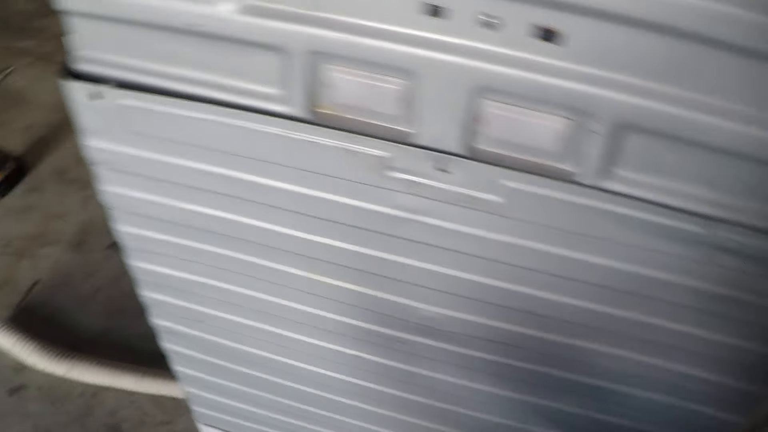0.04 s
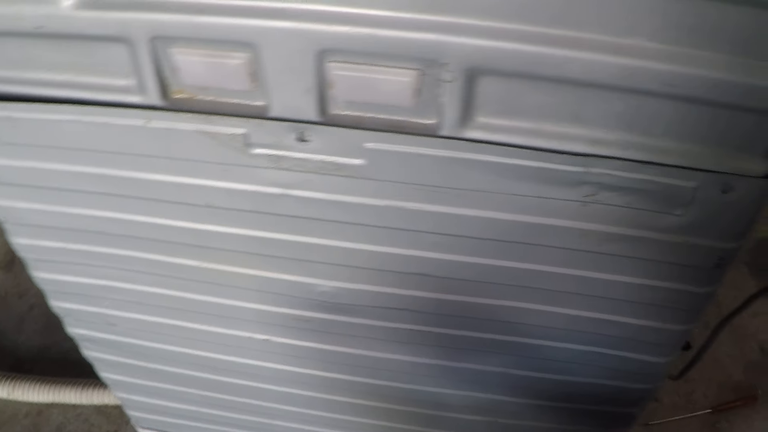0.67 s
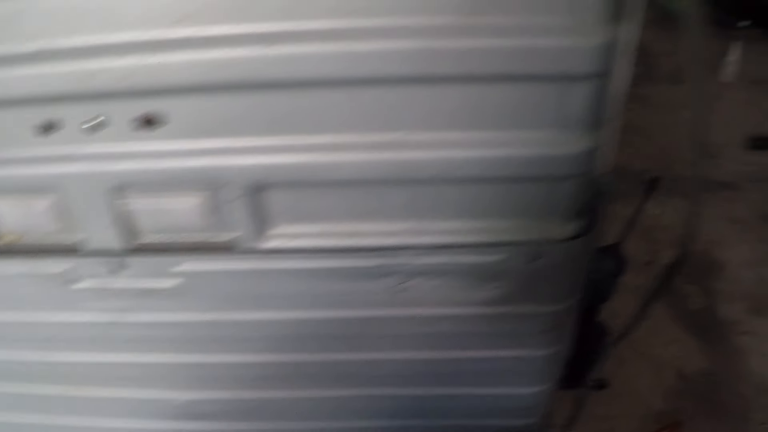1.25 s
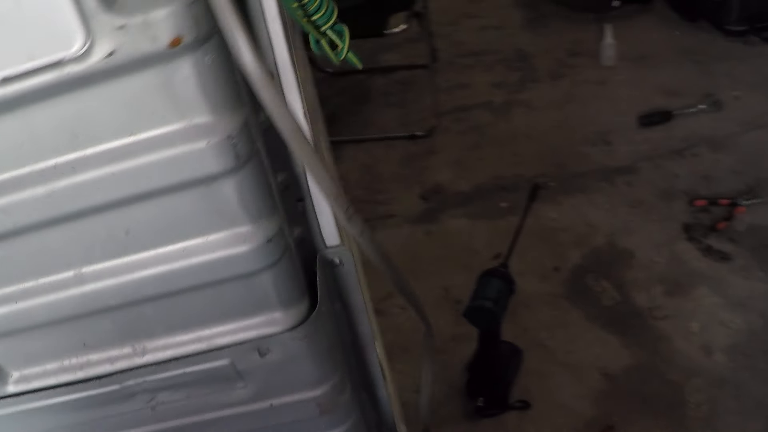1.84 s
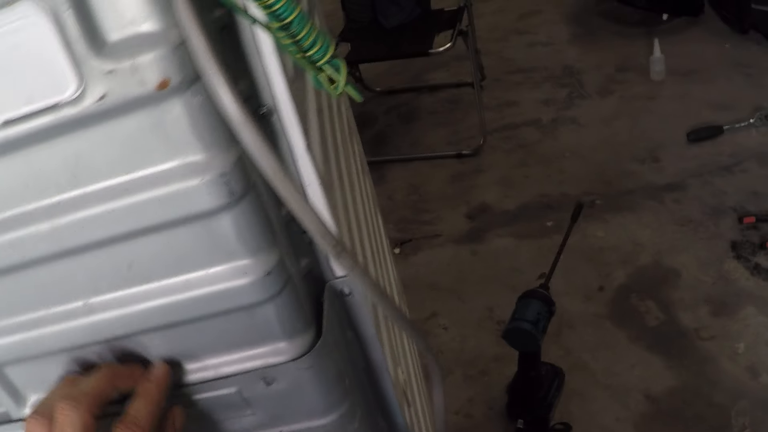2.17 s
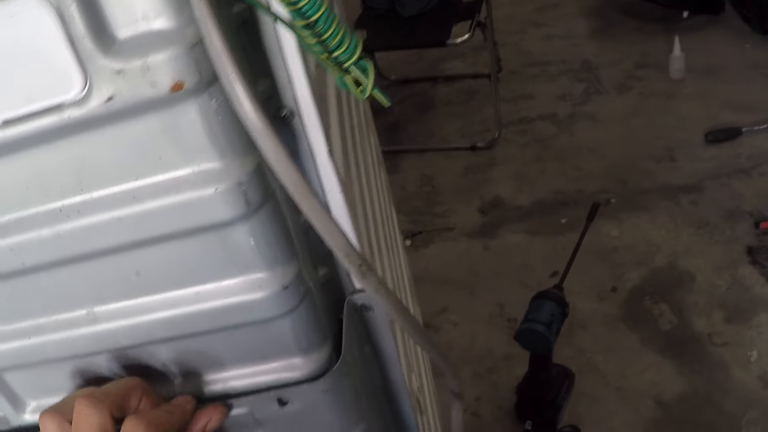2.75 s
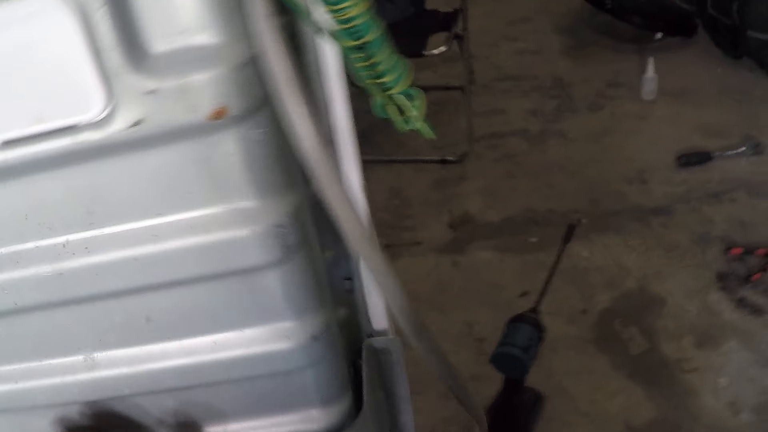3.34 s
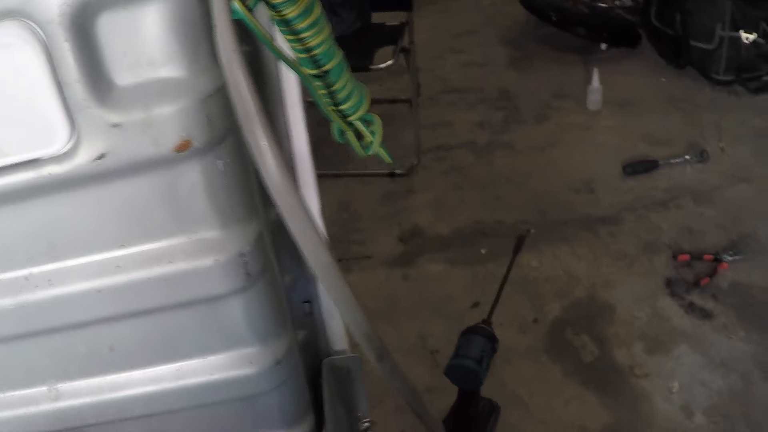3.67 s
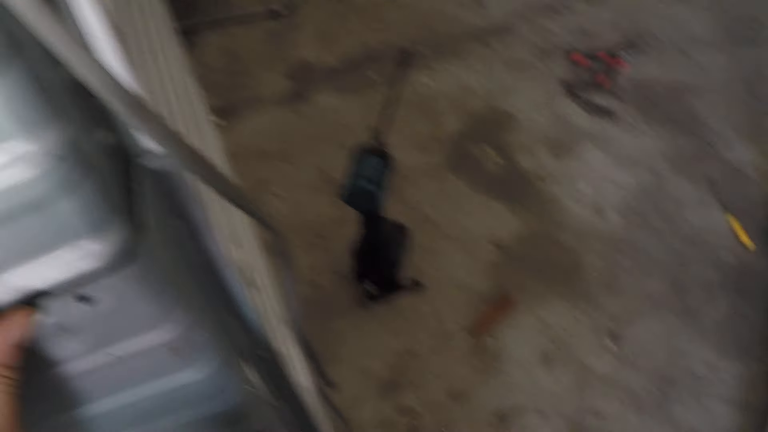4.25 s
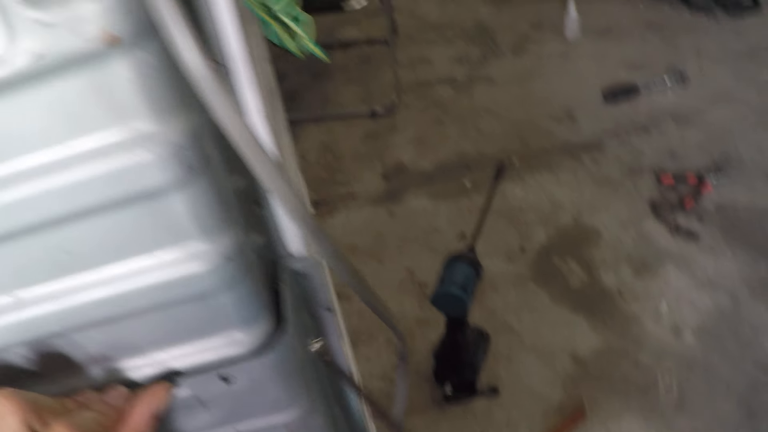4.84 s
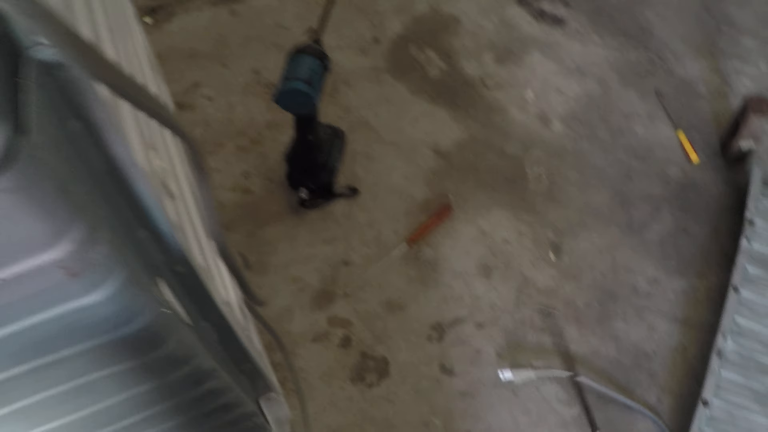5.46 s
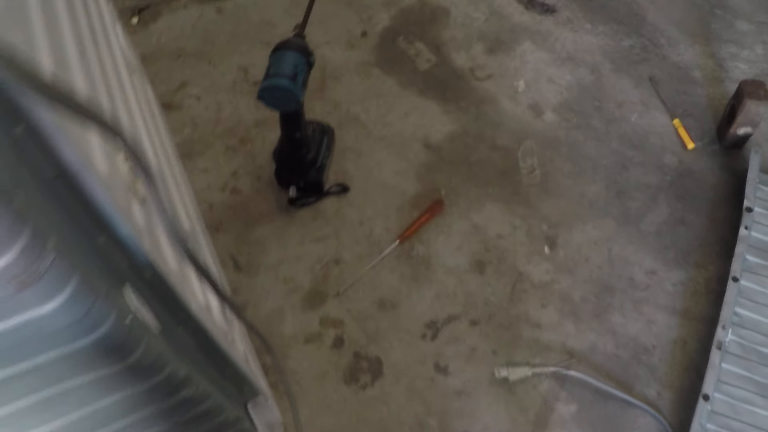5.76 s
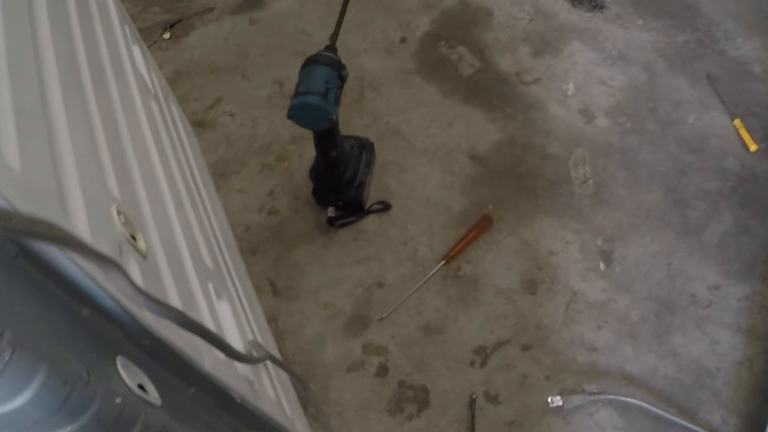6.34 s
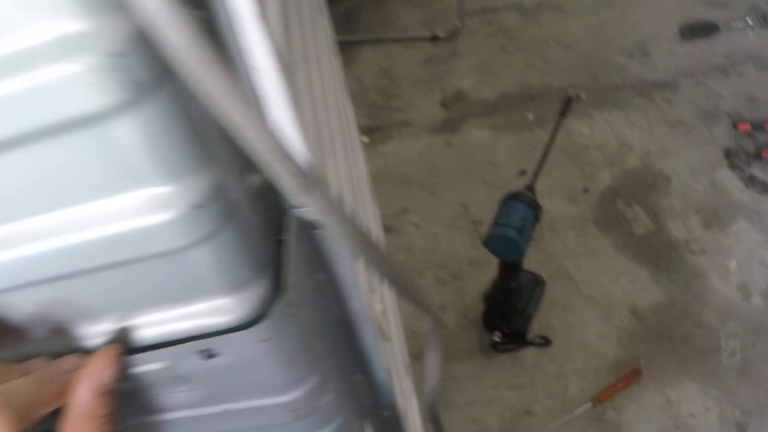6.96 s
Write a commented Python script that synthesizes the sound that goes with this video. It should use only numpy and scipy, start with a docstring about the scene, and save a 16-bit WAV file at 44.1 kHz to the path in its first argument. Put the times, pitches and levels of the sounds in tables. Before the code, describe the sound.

A fan motor hums throughout in a workshop, a steady low pitch over a hollow cabinet drone and a soft rush of air with a very faint high whine. The handheld microphone rumbles and rubs as it moves, and the hum shifts slightly in strength and brightness. At about 2.1 seconds air escapes in one sudden hiss that dies away within half a second. From 3.3 to 3.5 seconds fingers make a quick cluster of dull thumps and sharp clicks on the microphone body, with another click near 3.9. The rumble grows heavier here; hard jolts briefly lower everything before the hum creeps back. A thump lands at 4.8 seconds and a sharp click at 5.1. Small parts tick faintly now and then, most clearly between 6.2 and 6.6 seconds, with a short room echo. The hum continues to the end, just after 7 seconds.

```python
"""A motor with a six-blade fan hums in a workshop: shaft harmonics, cabinet drone, a rush of air.
Someone handles a sheet-metal hatch, camera in the other hand; small parts tick and the room echoes.
The moving camera rumbles and jolts; fingers thump and click on its case. Air escapes in one short hiss.
Hard jolts make the camera's gain control duck everything; the hum then creeps back up."""
import sys
import numpy as np
from scipy import signal
from scipy.fft import rfft, irfft, next_fast_len
from scipy.io import wavfile
from scipy.ndimage import uniform_filter1d, minimum_filter1d, map_coordinates

SR = 44100
rng = np.random.default_rng(int(sys.argv[2]) if len(sys.argv) > 2 else 0)


def unload_wav(signal):
    """Save mono or channel-first audio to the path in sys.argv[1] as 16-bit WAV at rate SR, clipped to [-1, 1]."""
    wavfile.write(
        sys.argv[1],
        SR,
        np.round(np.clip(np.atleast_2d(signal).T, -1, 1) * 32767).astype(np.int16),
    )


N = 317520

# motor tones: multiple of shaft speed, level/dB re blade tone
SHAFT_TONES = [(2, -15), (3, -6), (4, -4.5), (5, -17), (6, 0), (7, -30), (8, -18.5), (10, -31), (12, -28.5),
               (14, -40.5)]
# fan speed: t/s, blade-pass f/Hz
BLADE_PASS_HZ = [(0, 261.9), (1.3, 262), (1.9, 263.2), (3.5, 260.6), (5, 262.1), (7.2, 260.4)]
# hum as the camera moves round the cabinet: t/s, level/dB, high-harmonic gain/dB
HUM_DB = [(0, -15, -1), (1, -15, -1), (1.8, -17, 5.5), (2.3, -16.5, -1.5), (2.8, -15.5, -8.5),
          (3.8, -15.5, -3.5), (4.5, -11.5, -4.5), (5.3, -13, -3.5), (5.7, -15.5, -8), (6.5, -12, -10.5),
          (7.2, -16.5, -7)]
# cabinet drone spectrum: f/Hz, relative density/dB
DRONE_SPECTRUM = [(30, -23), (100, -4), (130, 1), (150, -2), (175, 1.5), (225, -4.5), (280, -11),
                  (350, -18), (450, -26.5), (600, -37.5), (800, -45.5), (1500, -84)]
# drone at the moving camera: t/s, level/dB
DRONE_DB = [(0, -14.5), (1.5, -16), (3.1, -15), (4.2, -15), (5.4, -13.5), (6.3, -17.5), (7.2, -17)]
# air rush, in phase at both microphone ports: f/Hz, relative density/dB
RUSH_MID_SPECTRUM = [(200, -9.5), (600, 3), (1000, 0), (1600, -1), (2200, -2.5), (3000, -6.5),
                     (4500, -12.5), (6200, -9), (7500, -10.5), (9800, -11), (11500, -17.5), (13500, -21.5),
                     (15000, -34.5)]
# air rush, antiphase between the ports: f/Hz, relative density/dB
RUSH_SIDE_SPECTRUM = [(100, 10), (350, 14), (600, 12.5), (1000, 9), (1500, 4.5), (2100, 1), (2800, -8.5),
                      (4200, -15), (6200, -7.5), (7500, -10.5), (9800, -11), (11500, -17), (13500, -20.5),
                      (15000, -40)]
# air rush at the moving camera: t/s, level/dB
RUSH_DB = [(0, -36.5), (1.1, -38), (1.5, -37), (1.9, -39), (2.6, -39.5), (3.1, -37), (4.2, -36),
           (4.9, -36.5), (5.4, -34.5), (5.85, -40.5), (6.4, -37.5), (7.2, -39.5)]
# handling rumble spectrum: f/Hz, relative density/dB
RUMBLE_SPECTRUM = [(6, -19), (20, -1), (55, -1), (90, -4.5), (130, -12.5), (200, -15), (300, -36),
                   (500, -51.5), (900, -87.5)]
# rumble from the restless hand: t/s, level/dB
RUMBLE_DB = [(0, -16), (1.4, -19.5), (1.9, -10), (2.8, -15.5), (3.6, -2.5), (4.3, -6.5), (4.5, -5.5),
             (5.2, -8.5), (5.9, -7.5), (7.2, -9)]
# hand at rest: t/s, length/s, rumble dip/dB
HAND_RESTS = [(3.714, 0.035, 7), (3.952, 0.032, 12), (4.464, 0.07, 8), (4.817, 0.048, 31),
              (5.687, 0.036, 16), (5.893, 0.03, 7), (6.396, 0.086, 3.5), (7.01, .07, 1)]
# camera jolts: t/s, length/s, rumble/dB, rub/dB
CAMERA_JOLTS = [(0.791, 0.036, -8, -36), (1.497, 0.075, -8, -26), (1.686, 0.073, -3.5, -20),
                (2.14, 0.089, -11.5, -13), (3.135, 0.1, -22, -16), (3.29, 0.095, -11.5, -10),
                (3.476, 0.078, 2.5, -24), (3.839, 0.057, 0, -13.5), (4.097, 0.047, 4, -16),
                (4.239, 0.064, -0.5, -22), (4.368, 0.024, 2.5, -19), (4.751, 0.028, 3, -12),
                (4.94, 0.04, -6, -19), (5.316, 0.078, -8.5, -17.5), (5.462, 0.068, -1.5, -16),
                (5.587, 0.078, -3, -13.5), (6.244, 0.034, -5.5, -21), (6.763, 0.12, -5.5, -22)]
# hand rubbing the case: f/Hz, relative density/dB
RUB_SPECTRUM = [(80, -18.5), (170, 10), (300, -1), (430, -14), (600, -29), (1000, -41), (1800, -47),
                (3500, -65.5), (6000, -90)]
# small parts ticking: t/s, level/dB, centre f/Hz, width/octaves, t60/s
PART_TICKS = [(.563, -36.5, 6030, 0.06, 0.028), (.564, -45, 3300, .06, .03),
              (2.413, -39.5, 10700, 1, 0.067), (2.465, -36.5, 4720, 1, 0.074),
              (4.107, -36, 2200, 1.1, 0.056), (4.775, -40, 1400, .3, 0.012), (6.206, -40, 4297, 0.8, 0.028),
              (6.343, -35, 3880, 0.4, 0.015), (6.387, -42, 4000, 0.18, .025),
              (6.447, -37, 2600, 0.5, 0.038), (6.598, -28.5, 5600, 1, 0.02),
              (6.599, -37, 1050, 0.42, 0.088), (6.601, -28.5, 2100, 0.092, 0.034),
              (6.611, -42, 8600, 0.4, 0.2)]
# resonances of the parts: f/Hz, width/Hz, gain/dB
PART_MODES = [(2000, 680, 16), (3400, 880, -4.5), (4600, 640, -2.5)]
# workshop decay: f/Hz, t60/s
ROOM_T60_S = [(200, .5), (2000, 0.51), (10000, 0.28)]
# finger thumps on the case: peak t/s, level/dB, f/Hz, half length/s
FINGER_THUMPS = [(1.515, -18.5, 390, 0.002), (3.293, -13, 345, 0.0031), (3.312, -5, 322, 0.0027),
                 (3.318, -5, 196, 0.0053), (3.353, 1, 205, 0.004), (3.369, 6, 158, 0.0045),
                 (3.409, -6, 220, 0.0027), (3.451, 4.5, 184, .0035), (3.502, 7.5, 203, 0.0041),
                 (4.7718, -14, 410, 0.0032), (4.7752, 5.5, 226.7, 0.0034)]
# escaping air: f/Hz, relative density/dB
JET_SPECTRUM = [(100, -22.5), (200, 27), (320, 27.5), (450, 11.5), (700, 0.5), (1200, -9), (2300, -4.5),
                (4500, -14), (7000, -13), (10000, -14), (12000, -25), (15000, -30)]
# finger clicks on the case: t/s, level/dB, contact corner f/Hz, ring pitch ratio
FINGER_CLICKS = [(3.3621, -9.5, 4770, .965), (3.418, -15.5, 2800, .92), (3.4449, 3, 5400, 1.0),
                 (3.8623, -7, 2800, 1.02), (5.0691, 1, 1900, 1.02)]
# camera case modes: f/Hz, level/dB, t60/s
CASE_MODES = [(630, -10.5, 0.041), (975, -3.5, 0.016), (1180, -10, 0.011), (1450, -12, 0.013),
              (1790, -5, 0.014), (2047, -10, 0.027), (2480, -10.5, 0.017), (2820, -16.5, 0.01),
              (3800, -21.5, 0.02), (5730, -19.5, 0.0069), (6700, -15, .008), (7660, -19.5, 0.0091)]
# right port's lag for case-borne clicks: f/Hz, phase/rad
PORT_LAG_RAD = [(300, 2.2), (600, 3.4), (1000, 4.33), (1350, 5.76), (1700, 2.44), (2200, 1.4)]


def amp(db):
    """Decibels to gain."""
    return 10 ** (np.asarray(db) / 20)


def unit_rms(x):
    """Scale to rms 1."""
    return x / np.sqrt(np.mean(x ** 2) + 1e-20)


def log_interp(points, hz):
    """Read (f/Hz, value) points on a log axis."""
    knots_hz, values = np.transpose(points)
    return np.interp(np.log(hz + 1), np.log(knots_hz + 1), values)


def curves(rows):
    """One value per sample for each column after t/s."""
    knots_s, *columns = np.transpose(rows)
    return [np.interp(np.arange(N) / SR, knots_s, column) for column in columns]


def wobble(rate_hz):
    """Smooth random curve, rate_hz knots a second."""
    knots = rng.standard_normal(int(N * rate_hz / SR) + 4)
    return map_coordinates(knots, [np.arange(N) * rate_hz / SR])


def filtered(x, response):
    """Apply a frequency response."""
    size = next_fast_len(x.shape[-1] + SR // 4)
    return irfft(rfft(x, size) * response(np.fft.rfftfreq(size, 1 / SR)), size)[..., :x.shape[-1]]


def noise(spectrum):
    """Noise with the given spectrum."""
    return filtered(rng.standard_normal(N), lambda hz: amp(log_interp(spectrum, hz)))


def steady(x, span_s):
    """Level a noise over span_s, to rms 1."""
    power = signal.fftconvolve(x ** 2, signal.windows.hann(int(span_s * SR)), "same")
    return unit_rms(x / np.sqrt(np.abs(power) + 1e-12))


def patchy(x, depth_db):
    """Narrow bands swell and sink independently."""
    bands = signal.stft(x, nperseg=1024)[2]
    field = uniform_filter1d(rng.standard_normal(bands.shape), size=5, axis=0)
    field = uniform_filter1d(field, size=12, axis=1)
    return signal.istft(bands * amp(depth_db * unit_rms(field)), nperseg=1024)[1][:N]


def add(track, at_s, sound):
    """Mix a sound into a track."""
    part = track[..., round(at_s * SR):][..., :sound.shape[-1]]
    part += sound[..., :part.shape[-1]]


def swell(at_s, length_s):
    """Gaussian of height 1 around at_s."""
    out, t = np.zeros(N), np.arange(round(4 * length_s * SR)) / SR
    add(out, max(at_s - 2 * length_s, 0), np.exp(-(2 * (t / length_s - 2)) ** 2))
    return out


def motor(blades=6, waver_db=2.5, blade_waver_db=0.67, drift_rad=0.75):
    """Shaft harmonics: the blade tone stands firm, the others waver; high ones beam forward."""
    blade_hz, = curves(BLADE_PASS_HZ)
    hum_db, bright_db = curves(HUM_DB)
    shaft_rad = 2 * np.pi * np.cumsum(blade_hz / blades) / SR
    hum = np.zeros(N)
    for order, db in SHAFT_TONES:
        firm = order == blades
        sway = amp((blade_waver_db if firm else waver_db) * wobble(7))
        drift = 0 if firm else drift_rad * np.sqrt(order / blades) * wobble(6)
        beam = amp(bright_db) if order > blades else 1
        hum += amp(db) * sway * beam * np.sin(order * shaft_rad + drift + rng.uniform(0, 2 * np.pi))
    return amp(hum_db) * hum


def cabinet_drone():
    """The hollow cabinet drones evenly, softer as the camera turns away."""
    return amp(curves(DRONE_DB)[0]) * steady(noise(DRONE_SPECTRUM), span_s=0.2)


def air_rush(whine_hz=6148, sway_db=0.6):
    """Broad, slightly patchy rush with a thin whine; both differ between the ports."""
    level = amp(curves(RUSH_DB)[0] + sway_db * wobble(5))
    mid = patchy(noise(RUSH_MID_SPECTRUM), depth_db=1.5)
    side = noise(RUSH_SIDE_SPECTRUM)
    rush = unit_rms(np.array([mid + side, mid - side]))
    whine_level = amp(-38 + 2 * wobble(12))
    whine = whine_level * np.sin(2 * np.pi * whine_hz * np.arange(N) / SR + wobble(25))
    return level * (rush + np.array([2.2 * whine, -.8 * whine]))


def handling_rumble(unrest_db=1.0):
    """The held camera rumbles, less when the hand rests; each jolt adds a swell and a dull rub."""
    rest_db = sum(depth_db * swell(at_s, length_s) for at_s, length_s, depth_db in HAND_RESTS)
    holding = amp(curves(RUMBLE_DB)[0] + unrest_db * wobble(12) - rest_db)
    jolt_power = sum(amp(db) ** 2 * swell(at_s, length_s) for at_s, length_s, db, _ in CAMERA_JOLTS)
    rub_power = sum(amp(db) ** 2 * swell(at_s, length_s) for at_s, length_s, _, db in CAMERA_JOLTS)
    rumble = np.sqrt(holding ** 2 + jolt_power) * steady(noise(RUMBLE_SPECTRUM), span_s=0.2)
    rub = np.sqrt(rub_power) * steady(noise(RUB_SPECTRUM), span_s=0.042)
    return rumble + rub


def part_ticks(top_hz=11500):
    """Light contacts: short band-limited bursts excite the parts' resonances."""
    out, t = np.zeros((2, N)), np.arange(SR // 4) / SR
    body = lambda f: 1 + sum(amp(db) / (1 + ((f - hz) / (width_hz / 2)) ** 2)
                             for hz, width_hz, db in PART_MODES)
    rolloff = lambda f: 1 / (1 + (f / top_hz) ** 6)
    for at_s, db, centre_hz, octaves, t60_s in PART_TICKS:
        contact = lambda f: np.exp(-.5 * (np.log2((f + 1) / centre_hz) / octaves) ** 2)
        burst = filtered(rng.standard_normal((2, len(t))), lambda f: contact(f) * body(f) * rolloff(f))
        add(out, at_s, amp(db - 60 * t / t60_s) * unit_rms(burst))
    return out


def room_echo(x):
    """Diffuse workshop echo, shorter in the treble."""
    hz, t, bands = signal.stft(rng.standard_normal((2, SR // 2)), SR, nperseg=256)
    decay = amp(-60 * t / log_interp(ROOM_T60_S, hz)[:, None])
    tail = signal.istft(bands * decay, SR, nperseg=256)[1]
    return signal.fftconvolve(x, tail / np.linalg.norm(tail[0]), axes=1)[:, :N]


def finger_thumps(sag_per_s=105):
    """A soft pad pushes the case: one or two low cycles, pitch sagging as the pad flattens."""
    out, t = np.zeros(N), np.arange(-SR // 50, SR // 50) / SR
    for peak_s, db, hz, half_s in FINGER_THUMPS:
        cycles = hz * (1 - np.exp(-sag_per_s * t)) / sag_per_s
        envelope = amp(db) * np.exp(-(t / half_s) ** 2)
        add(out, peak_s + t[0], envelope * np.cos(2 * np.pi * cycles))
    return out


def air_jet(start_s=2.063, rise_s=0.0083, bright_t60_s=0.49, dull_t60_s=0.69, split_hz=3500):
    """Air escapes suddenly; as pressure falls, the top of the hiss dies first."""
    t = np.maximum(np.arange(N) / SR - start_s, 0)
    side_gain = lambda hz: amp(log_interp([(350, -16.0), (800, 7.0), (2000, 0.5), (4000, -2)], hz))
    mid = noise(JET_SPECTRUM)
    side = filtered(noise(JET_SPECTRUM), side_gain)
    hiss = unit_rms(np.array([mid + side, mid - side]))
    dull = filtered(hiss, lambda hz: 1 / (1 + (hz / split_hz) ** 2))
    fading = dull * amp(-60 * t / dull_t60_s) + (hiss - dull) * amp(-60 * t / bright_t60_s)
    return amp(-9.5) * (1 - np.exp(-t / rise_s)) * fading


def finger_clicks(push_s=0.00011, crack_t60_s=0.021, rebound_s=.0048, rebound_db=-15, right_db=-2.5):
    """Sharp push, crack, brief case ring, faint rebound; weaker and phase-shifted at the right port."""
    out, t = np.zeros((2, N)), np.arange(SR // 10) / SR
    mode_hz, mode_db, t60_s = np.transpose(CASE_MODES)[:, :, None]
    push = amp(-1) * t / push_s * np.exp(1 - t / push_s)
    for at_s, db, corner_hz, pitch in FINGER_CLICKS:
        for port in out:
            envelopes = amp(mode_db + rng.standard_normal(mode_hz.shape) - 60 * t / t60_s)
            ring = np.sum(envelopes * np.sin(2 * np.pi * pitch * mode_hz * t), axis=0)
            crack = amp(-18 - 60 * t / crack_t60_s) * rng.standard_normal(len(t))
            click = filtered(crack - ring - push, lambda f: 1 / (1 + 1j * f / corner_hz) ** 2)
            add(port, at_s, amp(db) * click)
            add(port, at_s + rebound_s, amp(db + rebound_db) * click)
    left, right = out
    right = filtered(right, lambda f: np.exp(-1j * log_interp(PORT_LAG_RAD, f)))
    return np.array([left, amp(right_db) * right])


def gain_control(x, threshold_db=-10, window_s=0.088, recover_db_per_s=3.5):
    """Gain drops at once by the excess over threshold, then recovers at a steady rate."""
    power = uniform_filter1d(np.mean(x ** 2, axis=0), int(window_s * SR))
    excess_db = np.maximum(10 * np.log10(np.abs(power) + 1e-12) - threshold_db, 0)
    recovery_db = recover_db_per_s * np.arange(N) / SR
    return x * amp(recovery_db - np.maximum.accumulate(excess_db + recovery_db))


def limiter(x, ceiling=.94, hold_samples=SR // 80):
    """Brief, smooth gain dips hold peaks to the ceiling."""
    needed_gain = ceiling / np.maximum(np.abs(x).max(axis=0), ceiling)
    return x * uniform_filter1d(minimum_filter1d(needed_gain, hold_samples), hold_samples)


def scene(left_lag_s=0.00014, echo_db=-6.0):
    """Stereo mix: low sounds reach the left port later; only the ticks echo."""
    ticks = part_ticks()
    bass = motor() + cabinet_drone() + handling_rumble() + finger_thumps()
    bass_left = filtered(bass, lambda hz: np.exp(-2j * np.pi * hz * left_lag_s))
    direct = np.array([bass_left, bass]) + air_rush() + air_jet() + finger_clicks() + ticks
    return direct + amp(echo_db) * room_echo(ticks)


def record(dry, top_hz=15000):
    """Slightly more sensitive right port, gain control, limiter, end fades, steep low-pass."""
    ports = dry * amp([[-.4], [.4]])
    faded = limiter(gain_control(ports)) * signal.windows.tukey(N, .002)
    return signal.sosfilt(signal.ellip(12, .1, 100, top_hz, fs=SR, output="sos"), faded)


dry = scene()
out = record(dry)
unload_wav(out)
```